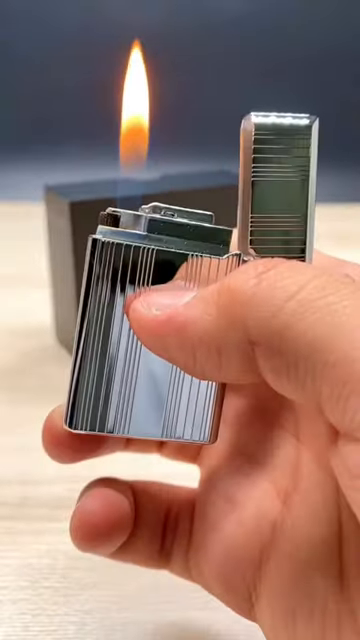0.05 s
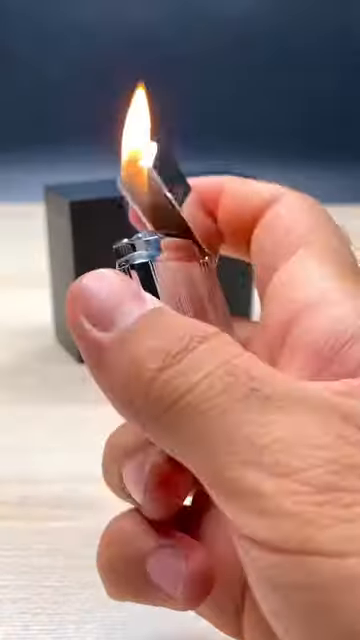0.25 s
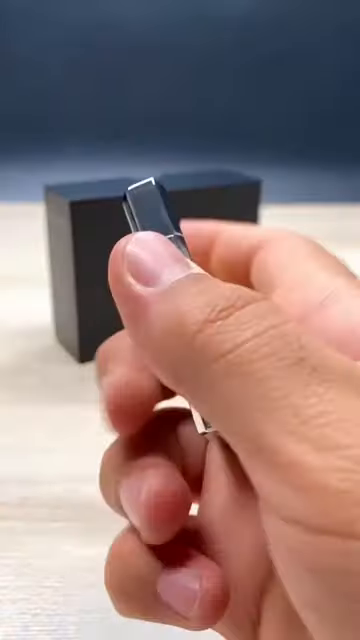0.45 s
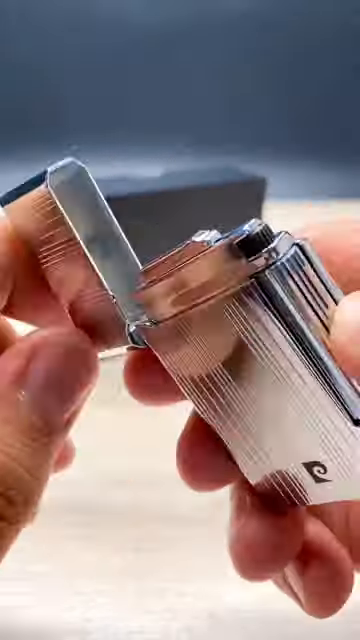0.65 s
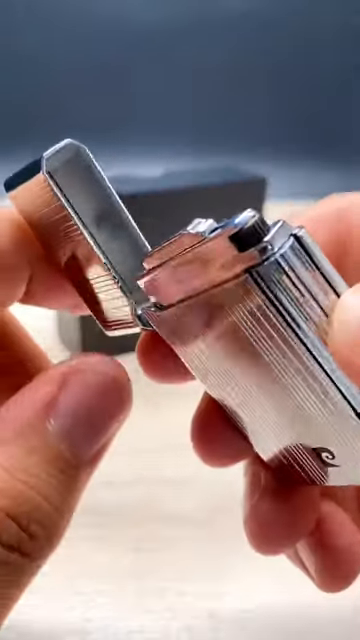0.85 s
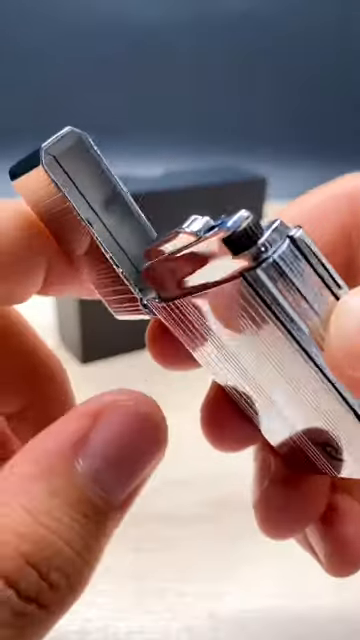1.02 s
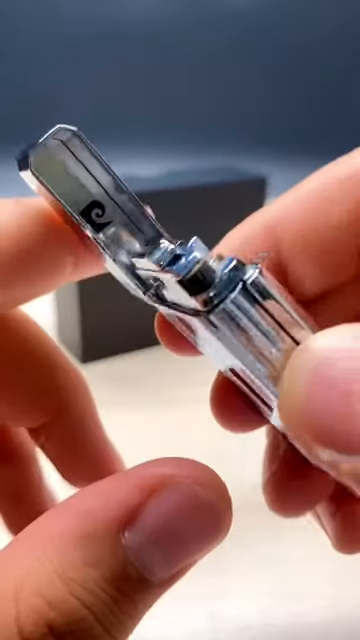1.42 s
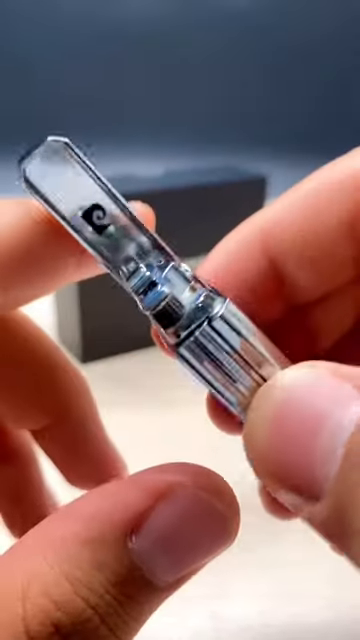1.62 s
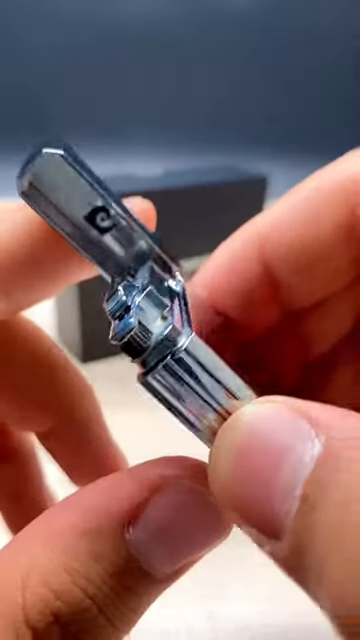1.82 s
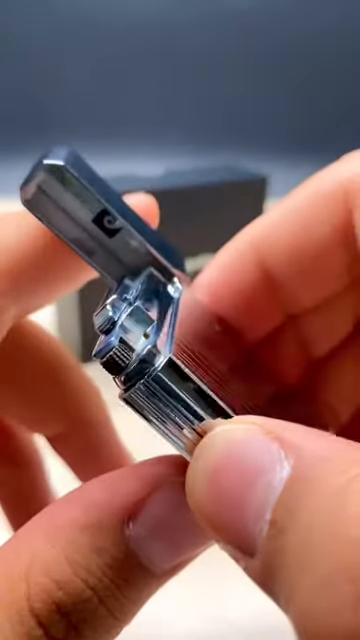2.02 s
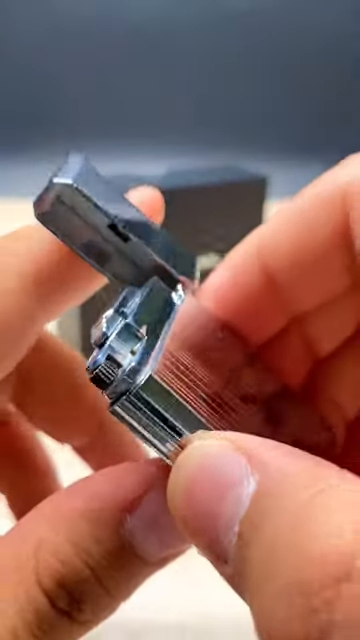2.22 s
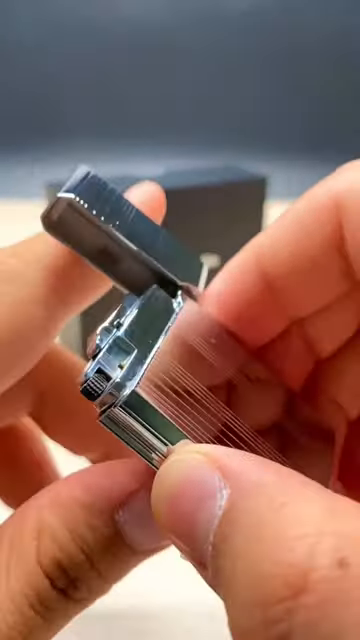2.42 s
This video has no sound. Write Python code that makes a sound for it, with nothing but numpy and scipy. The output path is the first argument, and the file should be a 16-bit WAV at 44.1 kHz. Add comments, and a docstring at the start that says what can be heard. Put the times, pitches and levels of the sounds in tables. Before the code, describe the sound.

A metal lighter lid snaps shut with one sharp click and a brief ring.

```python
"""A hand-held gas lighter, close to a stereo microphone in a small room with a low, wavering hum.
The flame flutters softly; a quarter second in, the metal lid rubs on its hinge, ticks and scrapes over
the catch, strikes and rebounds. The case rings briefly and thumps in the hand.
The room answers with a tail that stops short at about 0.6 s.
From 1.1 s a faint hiss of gas grows, the lid being open again."""
import sys
import numpy as np
from scipy import signal
from scipy.fft import rfft, irfft
from scipy.io import wavfile

SR = 44100
rng = np.random.default_rng(int(sys.argv[2]) if len(sys.argv) > 2 else 0)


def int16_out(signal):
    """Quantize to a 16-bit WAV file."""
    q = np.round(np.clip(np.atleast_2d(signal).T, -1, 1) * 32767)
    wavfile.write(sys.argv[1], SR, q.astype(np.int16))


N = 112454
T = np.arange(N) / SR
FREQS = np.maximum(np.fft.rfftfreq(N, 1 / SR), 1)

# lid meeting case (time [s], strength [dB], softness as treble loss [dB/kHz])
CONTACTS = [(.2362, -23, 3), (.2444, -22, 0), (.2469, 0, .15), (.24985, -3.5, .55)]
# modes of lid and case (frequency [Hz], level [dB], t60 [s], left minus right [dB], right lag [ms])
CASE_MODES = [(1120, -31, .02, 0, 0), (1920, -26, .022, -1, 0), (2385, -3, .015, -3, .06),
              (2630, 0, .009, -4, .1), (3085, -2, .015, -2.5, .07), (3560, -13, .016, 1, .05),
              (4132, -11, .02, -2, .08), (4465, -13, .019, -1, .04), (4968, -9, .018, 2.5, -.06),
              (5648, -6, .024, 0, .015), (6300, -18, .016, -1, .013), (7850, -15, .017, 1, .024),
              (8365, -12, .016, 1, .02), (8660, -13, .016, -1, .02), (10185, -14, .015, -2.3, .024),
              (11395, -11, .016, -4, .04)]
# tones that linger in the seated body (frequency [Hz], level [dB], t60 [s])
BODY_MODES = [(2306, -52.5, 0.15), (3045, -50.5, 0.083), (4480, -50.5, .2), (5605, -47, 0.22),
              (5700, -48.5, .28)]
# crack of one contact (frequency [Hz], relative level [dB])
CRACK_SPECTRUM = [(400, -29), (800, -28), (1100, -16.5), (1500, -20.5), (2500, -3), (5000, 0.5), (9000, -1),
                  (12000, -2.5), (13000, -26.5)]
# lid sliding on the catch (frequency [Hz], relative level [dB])
SCRAPE_SPECTRUM = [(1800, -21.5), (2500, -7), (3200, -7), (4100, 2.5), (5000, -7.5), (6000, -20),
                   (11000, -33.5)]
# hinge friction (frequency [Hz], relative level [dB])
HINGE_SPECTRUM = [(300, 9.5), (1200, 10.5), (2600, 5), (4200, 11), (5500, -15.5), (12000, -32.5)]
# burning gas (frequency [Hz], relative level [dB])
FLAME_SPECTRUM = [(150, 2), (400, -1), (700, -23.5), (1200, -18.5), (2600, -20), (4000, -34), (10000, -42)]
# escaping gas (frequency [Hz], relative level [dB])
GAS_SPECTRUM = [(3000, -30), (6800, -11), (7350, -3), (8000, -13.5), (9300, -12), (9800, -2.5), (10200, 4),
                (10900, -9), (13000, -22.5)]
# course of the gas hiss (time [s], level [dB])
GAS_LEVEL = [(1.1, -115), (1.35, -92.5), (2.0, -93), (2.27, -87.5), (2.5, -88), (2.54, -99)]
# echoes off table and walls (delay [s], level [dB], left minus right [dB])
REFLECTIONS = [(0.0113, -26, 1.5), (.0165, -34, -3.5), (.027, -34, 1)]
# dense early reflections (frequency [Hz], relative level [dB])
EARLY_SPECTRUM = [(530, -74.5), (900, -41.5), (1000, -34), (1080, -40), (1340, -21), (1880, -8),
                  (2050, -11.5), (2310, -1.5), (2690, -10), (3130, 0.5), (3530, -13.5), (4430, -0.5),
                  (4880, -15), (5620, -0.5), (6130, -14.5), (8040, -12), (9980, -14.5), (10700, -23.5),
                  (12000, -53.5), (15600, -84.5), (22000, -120)]
# late reverberation (frequency [Hz], relative level [dB])
LATE_SPECTRUM = [(470, -56), (800, -25.5), (1070, -19.5), (1180, -21.5), (1540, -15), (1710, -15),
                 (2060, -10.5), (2400, 2), (3320, -12), (3960, -8.5), (5170, -15), (5480, -6.5),
                 (5750, -5.5), (6310, -24.5), (7870, -19.5), (10100, -28), (10800, -29), (11800, -29),
                 (13000, -35)]
# thin hiss that ends the tail (frequency [Hz], relative level [dB])
WASH_SPECTRUM = [(300, 7), (550, 4.5), (900, -4), (2500, 4.5), (4000, -2), (5600, -15), (6400, -10.5),
                 (8200, -7.5), (9500, -13), (11000, -7), (12900, -31)]
# course of the hum (time [s], relative level [dB])
HUM_LEVEL = [(0.0, -85), (0.03, -58), (0.15, -48), (0.19, -61), (0.27, -58), (0.3, -60), (0.41, -65),
             (0.42, -48), (1.11, -72.5), (1.14, -54.5), (1.55, -59), (1.59, -50.5), (1.62, -78.5),
             (1.71, -55), (1.91, -53), (2.03, -75.5), (2.09, -56.5), (2.55, -59)]
# room rumble (frequency [Hz], relative level [dB])
RUMBLE_SPECTRUM = [(12, -61), (20, -31.5), (47, -4.5), (69, -3), (84, -7), (97, -9.5), (156, -17.5),
                   (248, -24), (352, -24.5), (454, -32.5), (499, -26), (558, -39.5), (900, -67.5),
                   (1170, -75), (1980, -120)]
# course of the rumble (time [s], relative level [dB])
RUMBLE_LEVEL = [(0.3, -73), (0.34, -86.5), (0.45, -70), (0.86, -78), (1.27, -71), (1.48, -78.5),
                (1.76, -73.5), (1.83, -78), (1.86, -71.5), (2.04, -79), (2.12, -71), (2.19, -86),
                (2.21, -73.5), (2.46, -72)]
# still room air (frequency [Hz], relative level [dB])
AIR_SPECTRUM = [(410, -25), (700, 0.5), (772, -6.5), (831, -2.5), (2240, -8.5), (7050, -12), (9930, -16.5),
                (11900, -16), (13000, -19.5)]

SEATED_S = .249  # the lid is home: after-ring and reverberation start


def lid():
    """Close up, each contact gives a short crack and rings the hand-damped modes of the case."""
    case_db, contact_s = -10.8, .0003
    snap = np.zeros((2, N))
    for start, strength_db, softness in CONTACTS:
        ring = amp(-18) * fall(T - start, t60=.016) * wide(CRACK_SPECTRUM, likeness=.33)
        near = (T > start - .01) & (T < start + .1)
        for k, (hz, mode_db, t60, pan_db, lag_ms) in enumerate(CASE_MODES):
            age = T[near] - start - np.array([[-lag_ms], [lag_ms]]) / 2000  # half the lag a side
            mode = swell(age, contact_s) * fall(age, t60) * np.sin(2 * np.pi * hz * age)
            ring[:, near] += (-1) ** k * amp(case_db + mode_db) * pan(pan_db) * mode
        snap += irfft(rfft(ring) * amp(strength_db - softness * FREQS / 1000), N)
    return snap


def thump():
    """The case jolts in the hand with a dull knock; the low sound falls quickly in pitch."""
    end_hz, sweep_hz, drop_s = 58, 514, .0032
    age = T - .2492
    turns = end_hz * age + sweep_hz * drop_s * swell(age, drop_s)
    envelope = swell(age, rise=.002) * fall(age, t60=.068)
    return -amp(-23) * pan(-4) * envelope * np.sin(2 * np.pi * turns)


def after_ring():
    """The metal body rings on faintly after the lid has seated."""
    age = T - SEATED_S
    tones = np.zeros((2, N))
    for hz, db, t60 in BODY_MODES:
        phase_drift = .5 * np.array([walk(30), walk(30)])
        tones += amp(db) * fall(age, t60) * np.sin(2 * np.pi * hz * age + phase_drift)
    return tones


def scrape():
    """Metal slides over the catch, harder and harder until the lid lands."""
    from_s, to_s, rise_s = .2388, .2472, .0055
    pressure = ((T > from_s) & (T < to_s)) * np.exp(-np.abs(T - to_s) / rise_s)
    return amp(-31.5) * pressure * pan(-1.5) * wide(SCRAPE_SPECTRUM, likeness=.17)


def hinge():
    """The hinge rubs faintly, louder as the lid swings down."""
    end_s, rise_s = .244, .017
    swing = (T < end_s) * np.exp(-np.abs(T - end_s) / rise_s)
    return amp(-59) * swing * wide(HINGE_SPECTRUM, likeness=.4)


def flame():
    """Dead centre, the burning gas flutters softly until the lid covers it."""
    flutter = amp(-78 + 2 * walk(12))
    return flutter * fade_out(end_s=.25, fade_s=.013) * wide(FLAME_SPECTRUM, likeness=1)


def gas():
    """Gas escapes from the open lighter with a thin, wavering hiss."""
    level_db = level_curve(GAS_LEVEL) + 2 * walk(12)
    return amp(level_db) * wide(GAS_SPECTRUM, likeness=.57)


def room(snap):
    """Table and walls echo the snap; bright reverberation dulls, thins to hiss and stops short."""
    age = T - SEATED_S
    echoes = sum(amp(db) * pan(pan_db) * later(snap, delay) for delay, db, pan_db in REFLECTIONS)
    early = amp(-38) * swell(age, rise=.0053) * fall(age, t60=.28) * wide(EARLY_SPECTRUM, likeness=.083)
    late = amp(-35) * swell(age, rise=.13) ** 2 * fall(age, t60=.61) * wide(LATE_SPECTRUM, likeness=.2)
    wash = amp(-69.5) * swell(T - .34, rise=.014) * wide(WASH_SPECTRUM, likeness=.3)
    sag = fall(np.maximum(T - .48, 0), t60=.54)  # the tail dies faster from 0.48 s
    tail = (early + late) * sag + wash
    return echoes + tail * fade_out(end_s=.616, fade_s=.0029)


def hum():
    """A low hum wavers in pitch and level, stronger and earlier at the right microphone."""
    hum_hz, waver_hz, trim_db = 69.1, 6, -3.5
    turns = np.cumsum(hum_hz + waver_hz * walk(12)) / SR
    tone = unit(amp(2 * walk(14)) * np.sin(2 * np.pi * turns))
    return at_microphones(amp(trim_db + level_curve(HUM_LEVEL)) * tone, pan_db=-4.5, lag_ms=-1.4)


def rumble():
    """Room rumble with a thin, wavering whine, also off to the right."""
    trim_db, whine_hz = 10.5, 500.6
    low = amp(trim_db + level_curve(RUMBLE_LEVEL) + walk(4.3)) * noise(RUMBLE_SPECTRUM)
    whine_gain = amp(-92.5 + 6 * walk(4))
    whine = whine_gain * unit(np.sin(2 * np.pi * whine_hz * T + .27 * walk(3.9)))
    return at_microphones(low + whine, pan_db=-5.5, lag_ms=-.82)


def air():
    """Still room air: a faint, even hiss all round."""
    return amp(-85) * wide(AIR_SPECTRUM, likeness=.23)


def amp(db):
    """Decibels to gain."""
    return 10 ** (np.asarray(db) / 20)


def unit(x):
    """Scale to rms 1."""
    return x / np.sqrt(np.mean(x ** 2))


def pan(db):
    """Left and right gains for a level difference, left minus right."""
    return amp(np.array([[db], [-db]]) / 2)


def fall(age, t60):
    """Decay by 60 dB in t60 seconds, silent before age 0."""
    return (age >= 0) * np.exp(-np.log(1000) * np.maximum(age, 0) / t60)


def swell(age, rise):
    """Rise from 0 to 1 with a time constant in seconds."""
    return 1 - np.exp(-np.maximum(age, 0) / rise)


def fade_out(end_s, fade_s):
    """Full level, then a straight fade to silence at end_s."""
    return np.clip((end_s - T) / fade_s, 0, 1)


def level_curve(points):
    """Straight lines through (time [s], level [dB]) points."""
    return np.interp(T, *np.array(points).T)


def noise(points):
    """Noise of rms 1 shaped by (frequency [Hz], level [dB]) points, falling away past both ends."""
    hz, db = np.array(points, float).T
    skirts = np.minimum(FREQS / hz[0], 1) * np.minimum(hz[-1] / FREQS, 1)
    gain = amp(np.interp(np.log(FREQS), np.log(hz), db)) * skirts ** 2
    return unit(irfft(rfft(rng.standard_normal(N)) * gain, N))


def wide(points, likeness):
    """Stereo noise; likeness is the share of power common to both channels."""
    common = noise(points)
    separate = np.array([noise(points), noise(points)])
    return np.sqrt(likeness) * common + np.sqrt(1 - likeness) * separate


def walk(rate_hz):
    """Slow random drift of rms 1."""
    return unit(irfft(rfft(rng.standard_normal(N)) * np.exp(-(FREQS / rate_hz) ** 2), N))


def later(x, seconds):
    """Delay a sound."""
    return irfft(rfft(x) * np.exp(-2j * np.pi * FREQS * seconds), N)


def at_microphones(x, pan_db, lag_ms):
    """One sound at the stereo pair, with a level difference and a lag on the right."""
    return pan(pan_db) * np.array([x, later(x, lag_ms / 1000)])


def scene():
    """The lighter up close, the room's answer and the room tone behind."""
    snap = lid()
    lighter = flame() + hinge() + scrape() + snap + after_ring() + thump()
    return lighter + room(snap) + hum() + rumble() + gas() + air()


def record(dry):
    """The recorder cuts the treble steeply above 13 kHz."""
    return signal.sosfilt(signal.ellip(8, .2, 70, 13000, fs=SR, output="sos"), dry)


dry = scene()
out = record(dry)
int16_out(out)
```